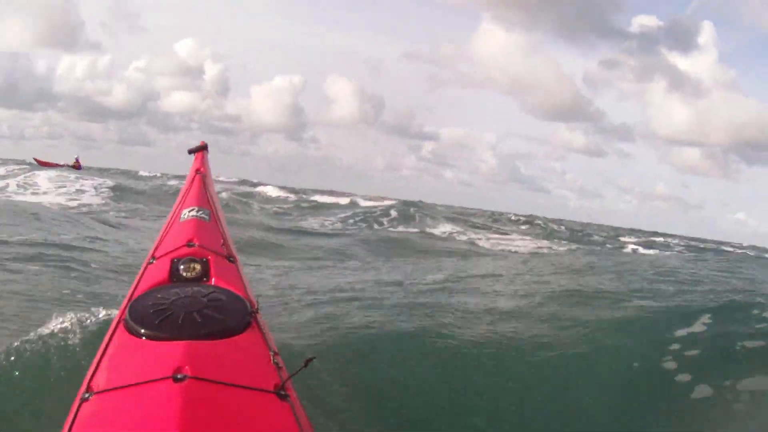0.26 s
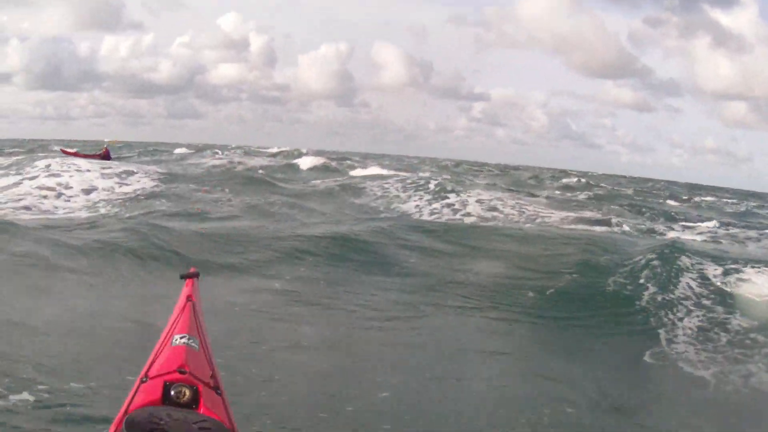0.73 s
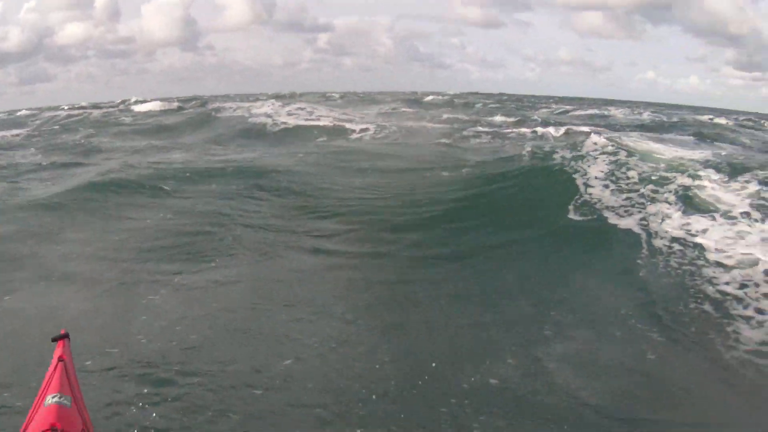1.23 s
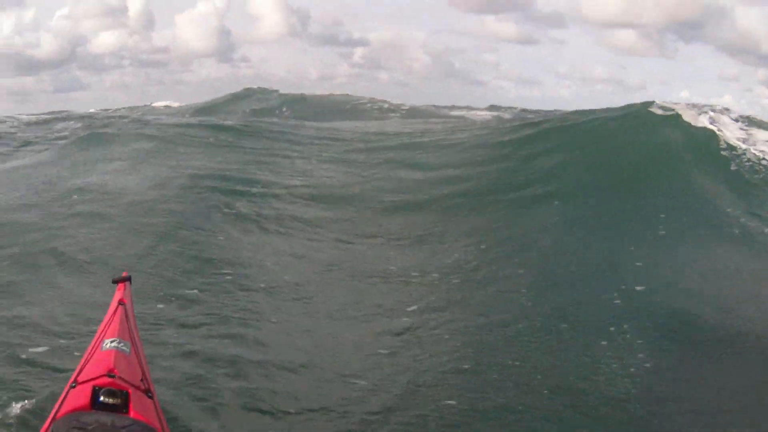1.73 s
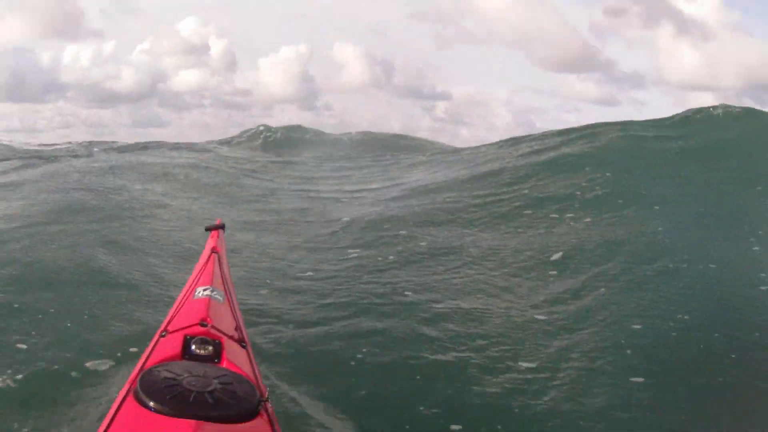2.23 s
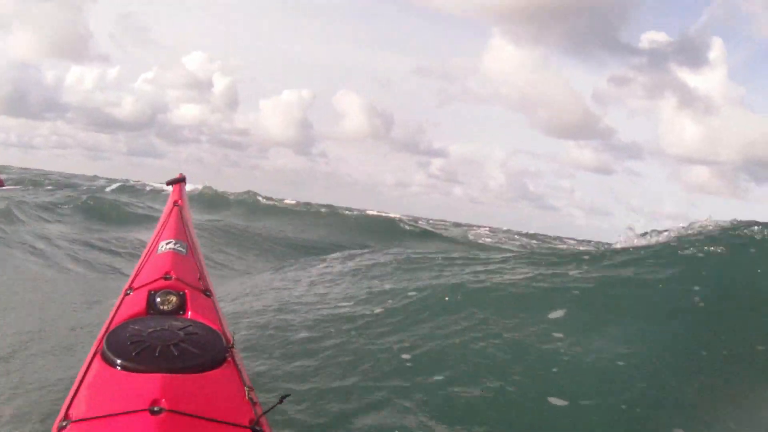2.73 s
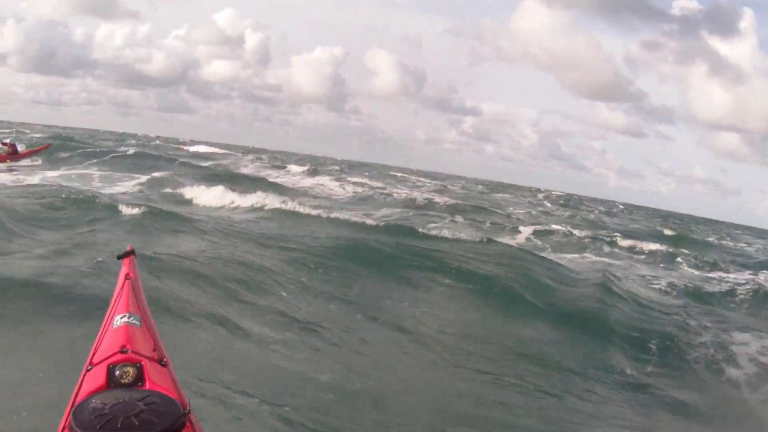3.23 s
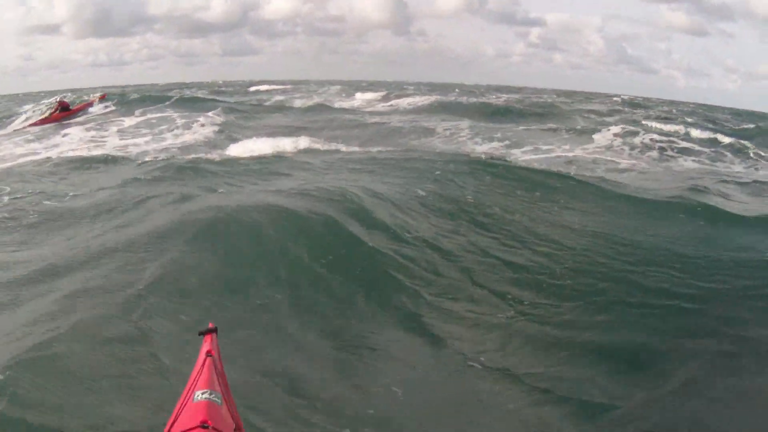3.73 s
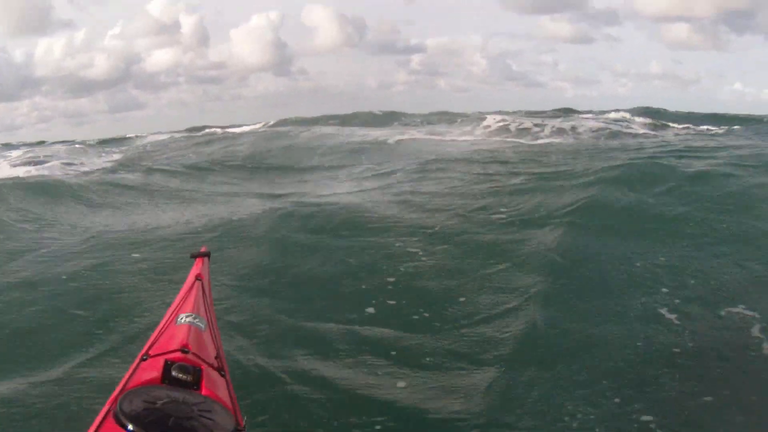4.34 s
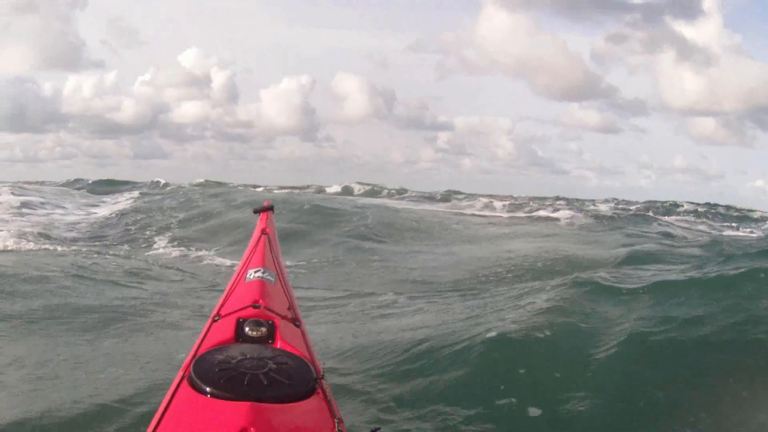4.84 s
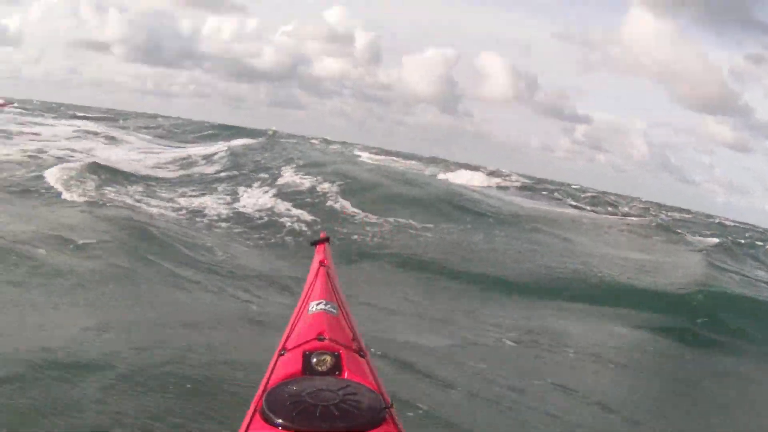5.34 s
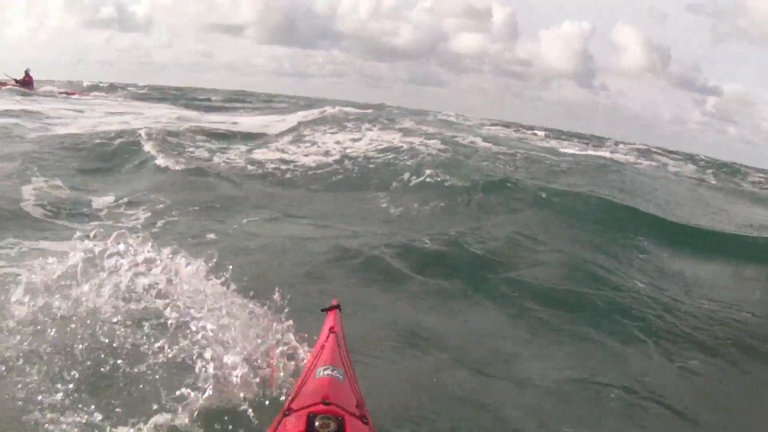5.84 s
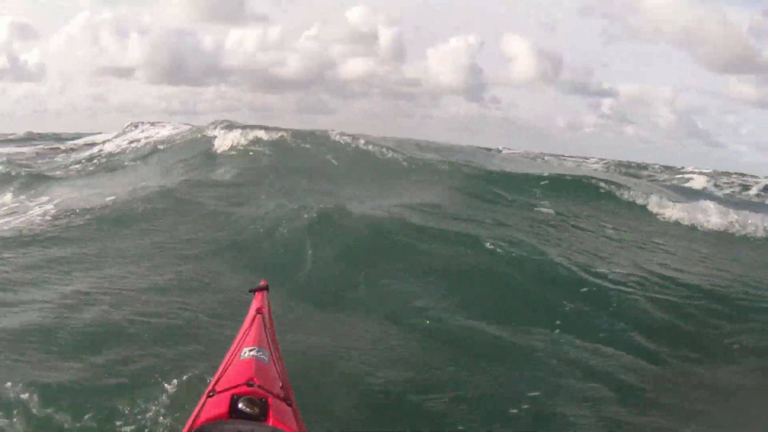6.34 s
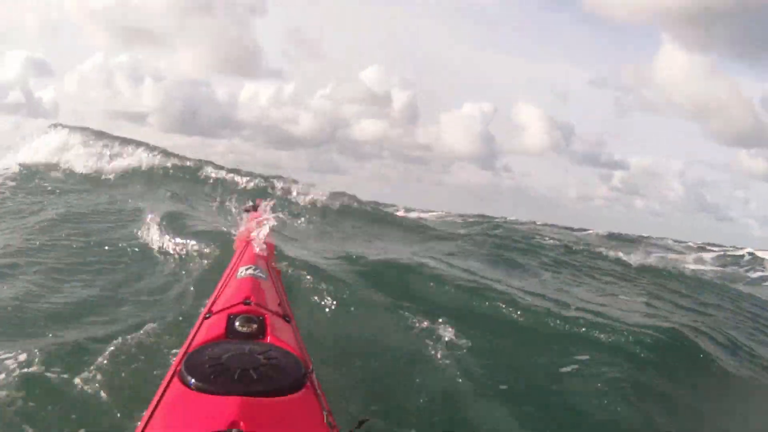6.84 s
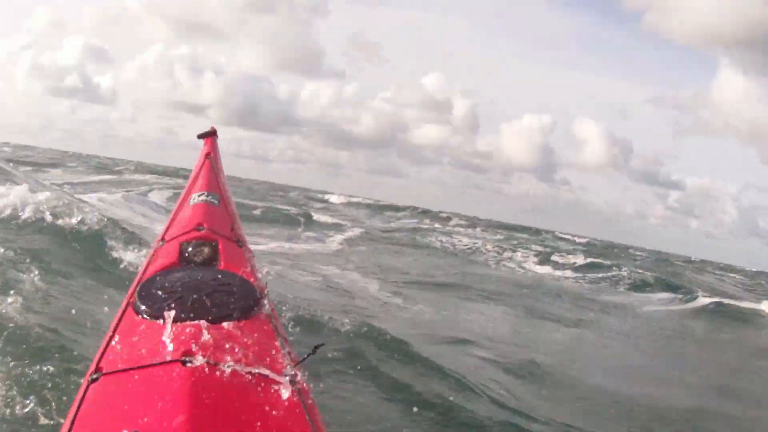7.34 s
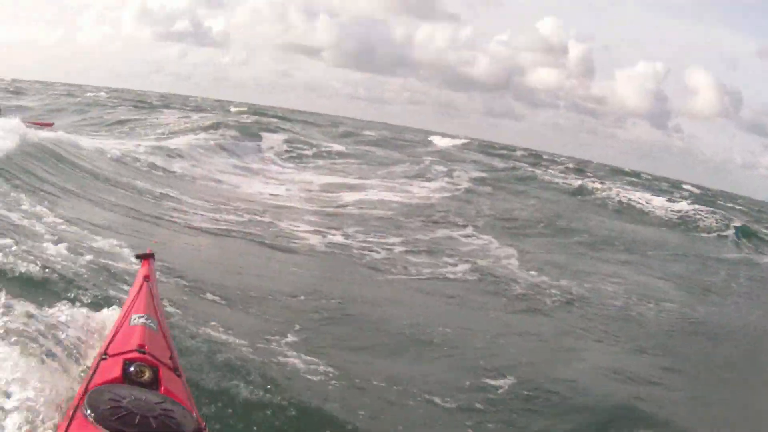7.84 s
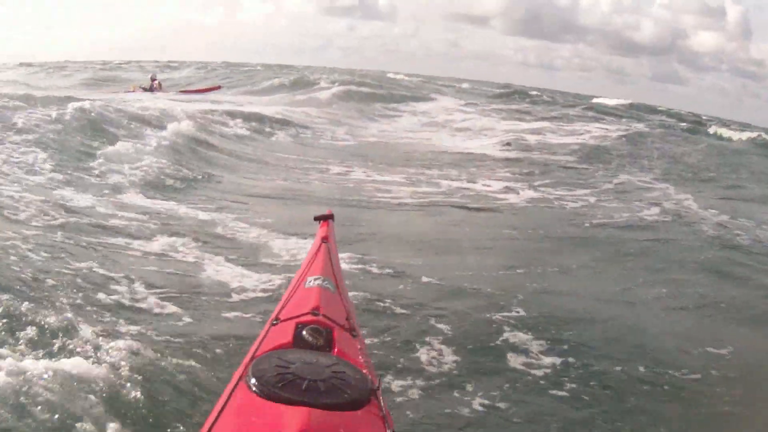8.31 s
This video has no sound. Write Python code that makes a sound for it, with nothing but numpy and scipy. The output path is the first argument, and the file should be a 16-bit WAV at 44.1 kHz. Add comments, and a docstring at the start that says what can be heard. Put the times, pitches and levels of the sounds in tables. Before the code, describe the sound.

Close, boxy, muffled sound of a sea kayak among breaking waves. Wind buffets the case in uneven bursts while water churns and gurgles along the hull. Small drops plink on the shell, trapped air gloops, spray ticks. Wave smacks come early and around three and a half seconds; a later hollow knock leads into a longer fizzing rush of whitewater.

```python
"""Kayak in breaking waves

A sea kayak rides steep breaking waves, heard from inside a waterproof case on deck.
Gusts and whitewater are shaped noise under moving levels; foam, gurgles and fizz add random damped sines.
Gulped air sings in sliding tones, drops plink and tick on the case, and waves smack a booming hull.
Every layer passes through the case, whose shell muffles the treble and rings near 2 kHz."""
import sys
import numpy as np
from scipy import signal
from scipy.fft import rfft, irfft, next_fast_len
from scipy.io import wavfile
from scipy.ndimage import map_coordinates

SR = 44100
rng = np.random.default_rng(int(sys.argv[2]) if len(sys.argv) > 2 else 0)


def unload_audio(sound):
    """Save the sound as a 16-bit wav file, at the path given as the first command line argument."""
    columns = np.transpose(np.atleast_2d(sound))
    # keep every value between -1 and 1, then stretch to whole-number steps
    steps = np.round(np.clip(columns, -1, 1) * 32767)
    wavfile.write(sys.argv[1], SR, steps.astype(np.int16))


N = 377937  # length in samples


def amp(db):
    """Decibels to gain."""
    return 10 ** (np.asarray(db) / 20)


def unit(x):
    """x at rms 1."""
    return x / np.sqrt(np.mean(x ** 2) + 1e-20)


def peaked(x, db):
    """x with its peak at db."""
    return amp(db) * x / np.abs(x).max()


def noise():
    """White noise as long as the scene."""
    return rng.standard_normal(N)


def burst(t60, size=4096):
    """A sharp puff of noise that decays by 60 dB in t60 seconds."""
    return rng.standard_normal(size) * amp(-60 * np.arange(size) / SR / t60)


def wobble(rate):
    """A smooth random curve, rate knots a second."""
    knots = rng.standard_normal(int(N * rate / SR) + 4)
    return map_coordinates(knots, [np.arange(N) * rate / SR])


def add(track, s, sound):
    """Mix a sound into the track at time s."""
    start = max(round(s * SR), 0)
    track[start:start + len(sound)] += sound[:N - start]


def along(points, hz):
    """(f/Hz, level/dB) points read on a log frequency axis."""
    f, v = np.transpose(points)
    return np.interp(np.log(hz + 1), np.log(f + 1), v)


def coloured(x, spectrum):
    """x shaped by (f/Hz, level/dB) points."""
    m = next_fast_len(len(x) + 8192)
    gain = amp(along(spectrum, np.fft.rfftfreq(m, 1 / SR)))
    return irfft(rfft(x, m) * gain, m)[:len(x)]


def swells(rows, floor_db):
    """Level in dB of swells (t, rise, hold, fall, level) that build, hold and ebb over a steady floor."""
    range_db = 20  # rise and fall times each span this much
    t = np.arange(N) / SR
    power = np.full(N, amp(floor_db) ** 2)
    for s, rise, hold, fall, db in rows:
        away = np.maximum(s - t, 0) / rise + np.maximum(t - s - hold, 0) / fall
        power += amp(db - range_db * np.minimum(away, 10)) ** 2
    return 10 * np.log10(power)


def bubbles(rate, pitch_hz, spread, cycles, scatter_db, rise, size=600):
    """Random damped sines of uneven size, each rising in pitch as it nears the surface."""
    count = int(rate * N / SR)
    when, pitch, loud = rng.uniform(1e-6, 1 - 1e-6, (count, 3)).T[:, :, None]
    hz = np.clip(pitch_hz * np.exp(spread * np.log(pitch / (1 - pitch))), 250, SR / 3)
    turns = hz * np.arange(size) / SR
    age = turns / cycles  # 1 when the ring has decayed by 60 dB
    strength = np.minimum(-np.log(loud), 4.2)  # most are faint, and none grows without limit
    ring = amp(scatter_db * strength - 60 * age) * np.sin(2 * np.pi * turns * (1 + rise * age))
    ring = ring * np.linspace(1, 0, size)
    where = (when * N).astype(int) + np.arange(size)
    return np.bincount(where.ravel(), ring.ravel(), N)[:N]


# what the case wall lets through: f/Hz, level/dB
CASE_WALL = [(40, -13.5), (200, -0.5), (600, -1), (1000, -3.5), (1600, -6), (2150, -7.5), (2700, -31.5),
             (3300, -23), (4300, -30.5), (7200, -25.5), (8700, -40.5), (10300, -40.5), (11500, -29.5),
             (16000, -33.5)]
# resonances of the case shell: f/Hz, width/Hz, lift/dB
CASE_RESONANCES = [(436, 202, 6.5), (1999, 310, 12), (3783, 450, 10.5), (4863, 800, 14.5),
                   (6440, 1060, 8.5), (11380, 2300, 7), (15200, 1600, 12)]


def case_ring(size=2048):
    """Causal impulse response of the case: wall loss plus shell resonances, made minimum-phase."""
    hz = np.fft.rfftfreq(size, 1 / SR)
    db = along(CASE_WALL, hz)
    for centre, width, lift in CASE_RESONANCES:
        db = db + lift / (1 + (2 * (hz - centre) / width) ** 2)
    cepstrum = irfft(np.log(amp(db)))
    # folding the cepstrum forward in time keeps the ring after the hit
    return irfft(np.exp(rfft(2 * cepstrum[:size // 2], size) - cepstrum[0]))


def housed(x):
    """x as it sounds inside the case."""
    return signal.oaconvolve(x, case_ring())[:len(x)]


# gusts: t/s at full strength, rise/s, hold/s, fall/s, drumming level/dB, deep rumble level/dB
GUST_SWELLS = [(0.0, .1, 0.25, 1, -25.5, -49), (1.004, 0.52, 0.18, .2, -25.5, -35.5),
               (1.368, 0.66, 0.36, 0.27, -17.5, -30), (1.93, .3, 0.077, 0.71, -20, -39),
               (2.464, .15, 0.053, 0.15, -26.5, -51), (3.052, 0.2, 0.45, 0.23, -27, -38),
               (3.723, 0.15, 0.23, 0.42, -22.5, -37.5), (4.13, .15, 0.2, 1.0, -21.5, -34.5),
               (4.61, .2, 0.31, 0.89, -27.5, -40), (5.387, 0.14, 0.048, 0.28, -24.5, -45),
               (5.763, 0.47, 0.39, .3, -26, -51), (6.43, 0.19, 0.24, 0.53, -21.5, -40.5),
               (7.68, 0.45, .43, 0.079, -27, -46.5), (8.0, .2, .55, .4, -40, -41)]


def wind_levels():
    """Each gust lifts the drumming and the rumble together above a steady breeze."""
    breeze_db, breeze_rumble_db = -33.5, -57.5
    drumming = swells([(*shape, db) for *shape, db, _ in GUST_SWELLS], breeze_db)
    rumble = swells([(*shape, db) for *shape, _, db in GUST_SWELLS], breeze_rumble_db)
    return drumming, rumble


# colour of the drumming outside the case: f/Hz, relative level/dB
BUFFET_COLOUR = [(25, -20), (70, -18), (130, -9), (250, 2), (350, -1), (470, -4), (650, -17), (1200, -24.5),
                 (3000, -47)]
# colour of the deep rumble outside the case: f/Hz, relative level/dB
RUMBLE_COLOUR = [(20, -8.5), (70, 0.5), (160, 3.5), (260, -8), (500, -46), (1500, -72)]


def wind(drumming_db, rumble_db):
    """Eddies drum on the case as fluttering noise, over a deeper, lumpy rumble."""
    eddies = amp(0.58 * wobble(18) + 1.56 * wobble(70))
    buffet = unit(eddies * housed(coloured(noise(), BUFFET_COLOUR)))
    lumps = amp(1.2 * wobble(15))
    rumble = unit(lumps * housed(coloured(noise(), RUMBLE_COLOUR)))
    return amp(drumming_db) * buffet + amp(rumble_db) * rumble


# air gulped beside the hull: t/s, peak level/dB, f/Hz before flutter, length/s, pitch rise/octaves
AIR_POCKETS = [(0.093, -27, 1354, .02, 0.32), (0.248, -24, 610, 0.014, 0.35), (0.44, -20, 520, 0.013, 0.25),
               (1.417, -24, 963, 0.0194, 0.79), (1.784, -41, 4800, 0.011, .05),
               (5.39, -38.5, 3350, 0.011, 0.26), (7.305, -22, 432, 0.02, 0.058),
               (7.335, -22, 367, 0.043, 1.18), (7.414, -25, 1265, 0.014, .05)]


def gloops():
    """Trapped air swells and sings, fluttering and sliding upward as its pocket closes."""
    track = np.zeros(N)
    for s, db, hz, length, octaves in AIR_POCKETS:
        age = np.linspace(0, 1, max(int(length * SR), 64))
        flutter = np.interp(age, np.linspace(0, 1, 12), rng.standard_normal(12))
        pitch = hz * 2 ** (octaves * age + 0.058 * flutter)
        swell = np.sin(np.pi * age) * amp(2 * flutter)
        note = swell * np.sin(2 * np.pi * np.cumsum(pitch) / SR)
        add(track, s, peaked(housed(np.pad(note, (0, 512))), db))  # room for the case to ring on
    return track


# soft drops landing on the case: t/s, peak level/dB before a 2.5 dB trim
SOFT_DROPS = [(0.1915, -14), (0.3581, -18), (0.5227, -15), (0.6664, -18), (0.6898, -16), (0.7497, -15),
              (1.8137, -23.5), (1.8357, -30), (2.7412, -22), (2.871, -20.5), (3.028, -19), (3.4176, -4),
              (4.8582, -17.5), (5.8735, -22), (7.0583, -14), (7.1322, -11), (8.3429, -12)]


def drops():
    """Soft drops make the shell plink: a quickly damped sine near 2230 Hz."""
    track = np.zeros(N)
    t = np.arange(1024) / SR
    for s, db in SOFT_DROPS:
        push = np.sin(2 * np.pi * rng.normal(2230, 50) * t) * amp(-60 * t / 0.0062)
        add(track, s, peaked(housed(push), db - 2.5))
    return track


# flecks and showers of fine spray on the case: t/s, peak level/dB, t60/s
SPRAY_TICKS = [(0.667, -34, 0.15), (2.295, -33, .03), (2.555, -36, 0.012), (2.704, -40, 0.02),
               (3.403, -26.5, .15), (3.493, -22, 0.44), (3.511, -16.5, 0.018), (5.136, -28.5, 0.36),
               (5.293, -17, 0.019), (5.458, -31, .06), (7.653, -23.5, .03)]


def ticks():
    """Fine hard spray ticks and prickles: bright decaying noise with a jumpy level."""
    track = np.zeros(N)
    snap_colour = [(300, -46), (2000, -33), (3500, -4), (7000, 3.5), (16000, 4.5)]  # f/Hz, level/dB
    for s, db, t60 in SPRAY_TICKS:
        grain = np.repeat(rng.standard_normal(256), 32)  # a new level every 32 samples
        flecks = burst(t60, size=len(grain)) * amp(6.5 * grain)
        snap = coloured(flecks, snap_colour)
        add(track, s, peaked(housed(snap), db))
    return track


# waves slapping the hull: t/s, peak level/dB before a 2.5 dB trim, relative level/dB of the thump at 400 Hz
HULL_SLAPS = [(0.529, -11, -4), (1.426, -18, -21), (3.417, -15.5, -15), (3.517, -12.5, -9),
              (7.456, -13.5, -7)]


def slaps():
    """Wave faces smack the side: a short noise puff strongest near 1100 Hz, with a hollow thump."""
    track = np.zeros(N)
    for s, db, thump_db in HULL_SLAPS:
        colour = [(80, -25), (400, thump_db), (1100, 20), (2000, -1.5), (5000, 0), (16000, -9)]
        smack = coloured(burst(t60=0.046), colour)
        add(track, s, peaked(housed(smack), db - 2.5))
    return track


# the hull falling onto the water: t/s, peak level/dB
HULL_KNOCKS = [(7.457, -12)]
# the hull's hollow answer: f/Hz, relative level/dB, t60/s
HULL_MODES = [(65, -5, .2), (140, -15, 0.18), (198, 3.5, 0.12), (296, -3, 0.12), (383, -5, .1)]


def knocks():
    """When the bow falls, the hollow hull booms: damped modes with a soft onset."""
    track = np.zeros(N)
    t = np.arange(SR // 4) / SR
    for s, db in HULL_KNOCKS:
        boom = np.zeros(len(t))
        for hz, level, t60 in HULL_MODES:
            boom += amp(level - 60 * t / t60) * np.sin(2 * np.pi * (hz * t + rng.uniform()))
        onset = 1 - np.exp(-t / .003)
        add(track, s, peaked(housed(boom * onset), db))
    return track


# waves washing along the hull, and a paddle splash at 5.79 s: t/s at full flow, rise/s, hold/s, fall/s, wash
# level/dB, spray level/dB
WATER_SURGES = [(0.08, 0.86, .37, 0.15, -35, -50.5), (0.6, 0.38, 0.24, 0.48, -32.5, -44.5),
                (1.25, .6, .22, 0.3, -33.5, -45), (2.2, .4, 0.088, .4, -41, -64),
                (3.08, 0.42, 0.13, .2, -43, -42.5), (3.25, 0.17, 0.12, .1, -27.5, -38.5),
                (3.52, 0.21, 0.095, 0.24, -24.5, -37.5), (3.95, 0.51, 0.15, .3, -36, -49.5),
                (4.4, 0.33, 0.14, 0.37, -35, -52), (4.85, 0.36, 0.08, 0.33, -40.5, -48.5),
                (5.38, 0.2, 0.1, 0.34, -36, -50.5), (5.79, 0.34, 0.17, 0.48, -40, -51),
                (6.24, 0.3, 0.068, 0.34, -30.5, -39), (7.15, 1, 1, 0.68, -35, -46.5),
                (7.9, 0.27, 0.57, 2.4, -29, -43.5)]
# crests bursting over the bow: t/s, wash level/dB, spray level/dB
BOW_SPLASHES = [(0.521, -29, -40.5), (1.415, -29.5, -50), (3.268, -23.5, -34.5), (3.41, -26, -34.5),
                (3.506, -33, -33.5), (3.63, -21.5, -37.5), (6.265, -33, -38.5), (6.351, -29, -46),
                (7.465, -36, -59), (7.884, -26.5, -38)]


def water_levels():
    """Slow surges and sudden splashes each drive both wash and spray above the open sea."""
    sea_wash_db, sea_spray_db = -36.5, -54.5
    rise_s, hold_s, fall_s = 0.017, 0.019, .06  # of every splash
    waves = list(WATER_SURGES)
    for s, wash_db, spray_db in BOW_SPLASHES:
        waves.append((s, rise_s, hold_s, fall_s, wash_db, spray_db))
    flow = swells([(*shape, db) for *shape, db, _ in waves], sea_wash_db)
    mist = swells([(*shape, db) for *shape, _, db in waves], sea_spray_db)
    return flow, mist


# colour of the spray outside the case: f/Hz, relative level/dB
SPRAY_COLOUR = [(500, -42), (1800, -15.5), (3000, -2.5), (5000, -1.5), (8000, 1), (16000, -1.5)]


def spray(spray_db):
    """Foam fizzes in clumps of tiny bursting bubbles; droplets crackle and blown mist prickles on the case."""
    hiss = unit(housed(coloured(noise(), SPRAY_COLOUR)))
    fizz = bubbles(rate=600, pitch_hz=4806, spread=0.202, cycles=72, scatter_db=6.5, rise=.08)
    fizz = unit(housed(coloured(fizz, SPRAY_COLOUR)))
    crackle = bubbles(rate=350, pitch_hz=6500, spread=0.26, cycles=7.7, scatter_db=7, rise=.1, size=64)
    crackle = unit(housed(coloured(crackle, SPRAY_COLOUR)))
    prickle = bubbles(rate=90, pitch_hz=13000, spread=0.1, cycles=30, scatter_db=3.0, rise=.1, size=128)
    prickle = unit(housed(prickle))
    clumps = amp(1.23 * wobble(22) + 0.92 * wobble(90))
    showers = amp(1.8 * wobble(9.7))
    foam = clumps * (amp(0.1) * hiss + amp(-9.0) * fizz + amp(-9.0) * crackle)
    return amp(spray_db) * (foam + amp(-13) * showers * prickle)


# colour of the foam rush outside the case: f/Hz, relative level/dB
WASH_COLOUR = [(30, -28), (150, -20.5), (400, 1), (700, 1.5), (1200, -1), (2100, 2.5), (3000, -3),
               (5000, -5.5), (16000, -28)]


def wash(wash_db):
    """Whitewater churns along the hull: a rush of foam with larger bubbles ringing in it."""
    foam = unit(amp(1.42 * wobble(45)) * housed(coloured(noise(), WASH_COLOUR)))
    gurgle = bubbles(rate=260, pitch_hz=934, spread=0.25, cycles=24, scatter_db=3.5, rise=0.1, size=1400)
    gurgle = unit(housed(gurgle))
    patter = bubbles(rate=260, pitch_hz=2050, spread=0.052, cycles=8.3, scatter_db=4.5, rise=0.053)
    patter = unit(housed(patter))
    churn = amp(.5) * foam + amp(-9) * gurgle + amp(-7) * patter
    return amp(wash_db + 0.25 * wobble(16)) * churn


def scene():
    """Wind and water around the boat."""
    wash_db, spray_db = water_levels()
    air = wind(*wind_levels())
    hits = gloops() + drops() + ticks() + slaps() + knocks()
    water = spray(spray_db) + wash(wash_db)
    return (air + hits + water)[None]


def record(dry):
    """The camera in the case keeps nothing above its band limit."""
    top_hz = 15850
    m = next_fast_len(N + SR // 2)
    keep = np.fft.rfftfreq(m, 1 / SR) < top_hz
    return irfft(rfft(dry, m) * keep, m)[:, :N]


dry = scene()
out = record(dry)
unload_audio(out)
```